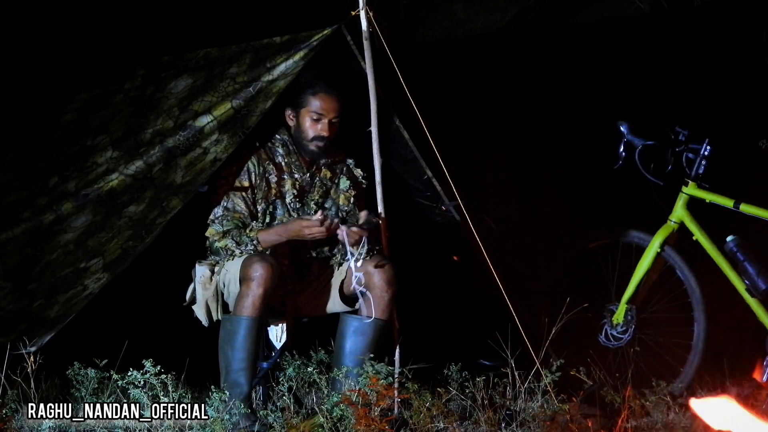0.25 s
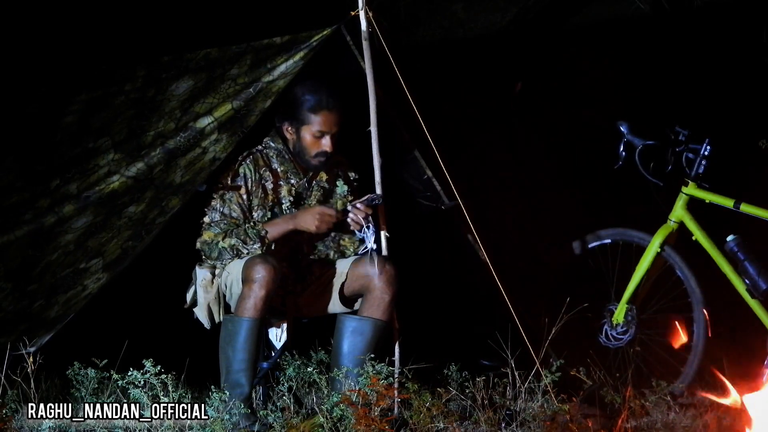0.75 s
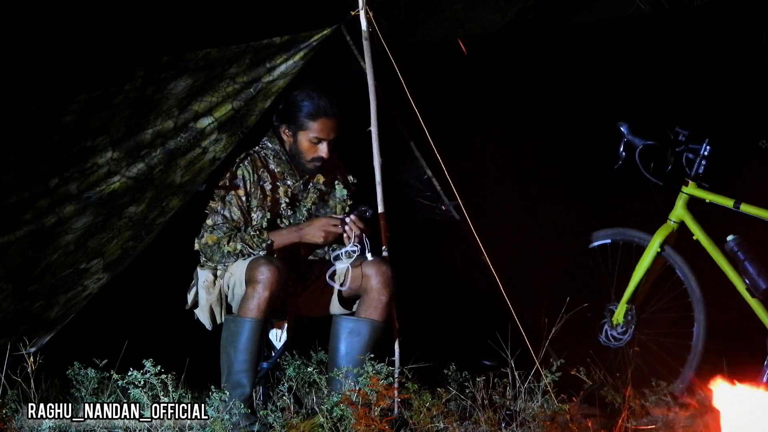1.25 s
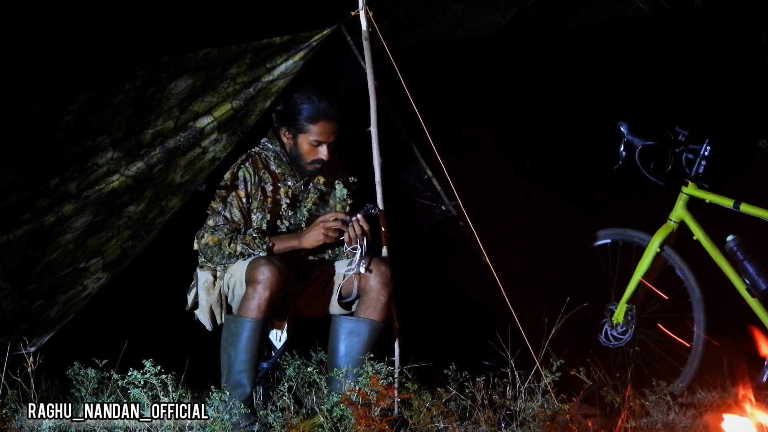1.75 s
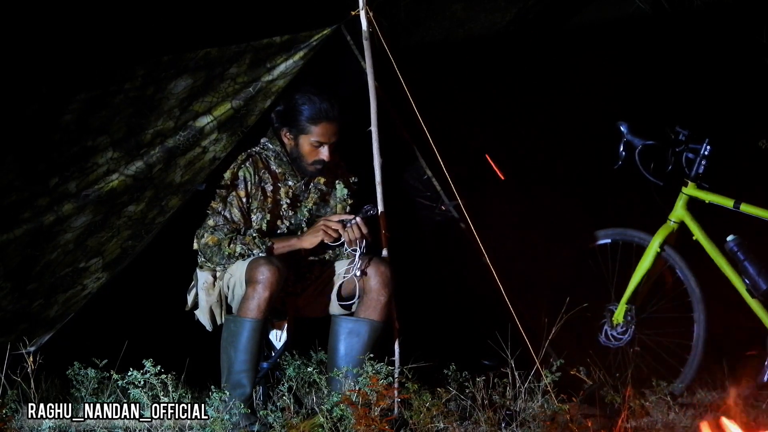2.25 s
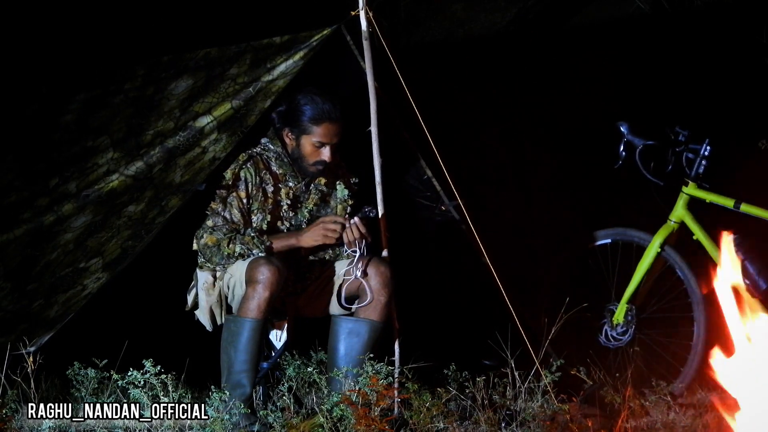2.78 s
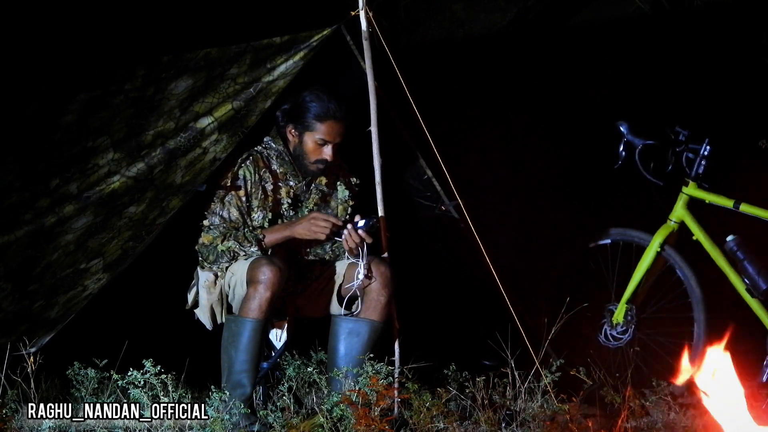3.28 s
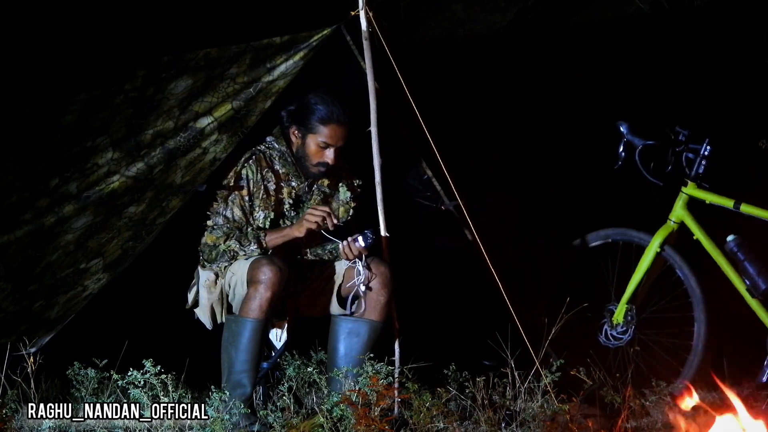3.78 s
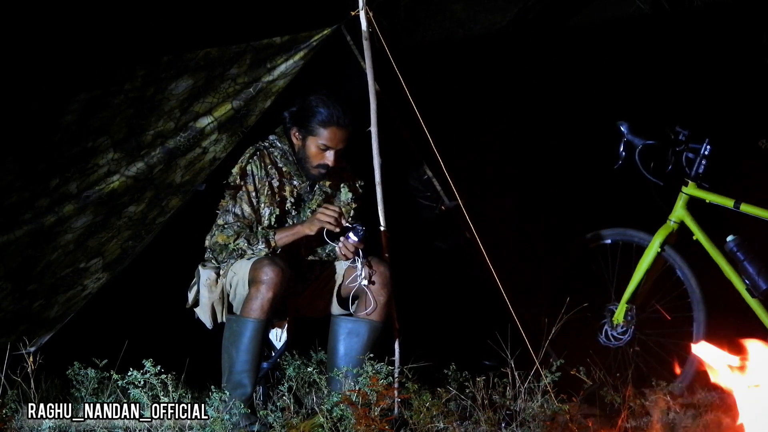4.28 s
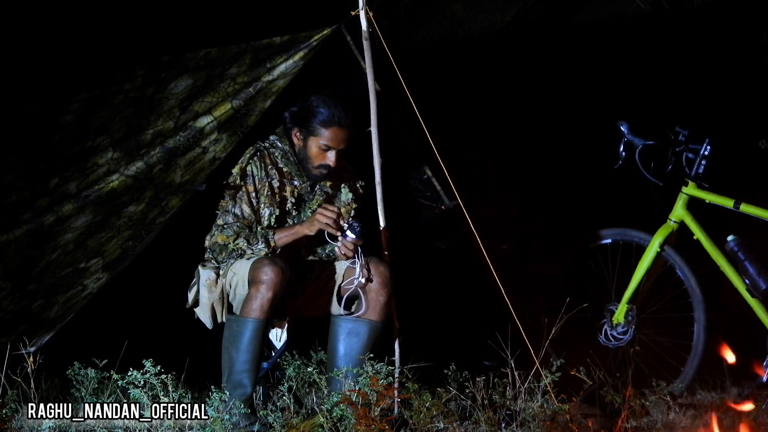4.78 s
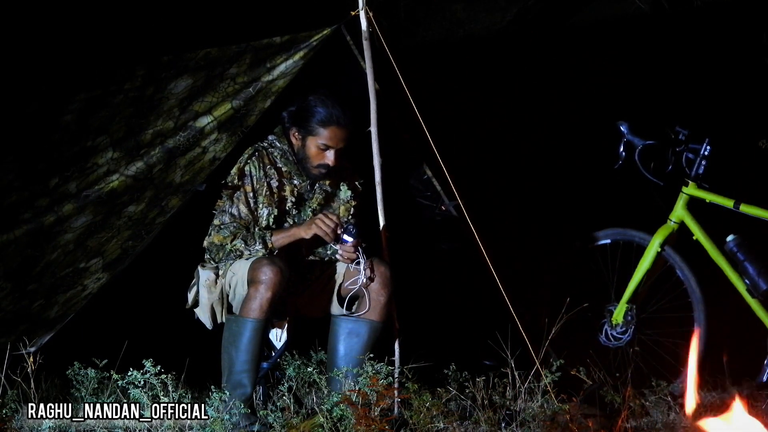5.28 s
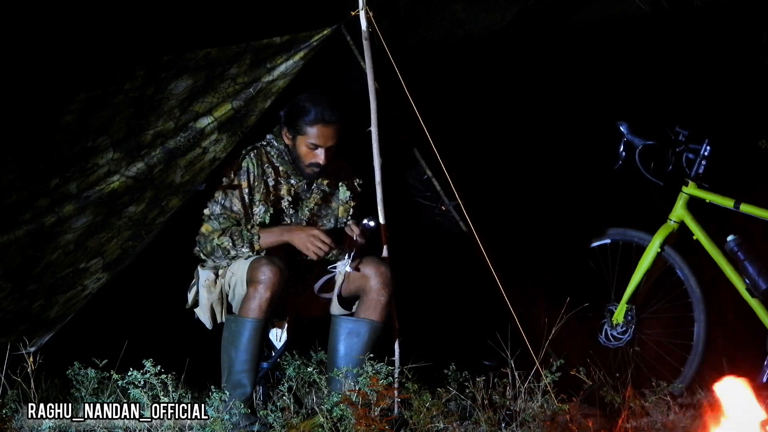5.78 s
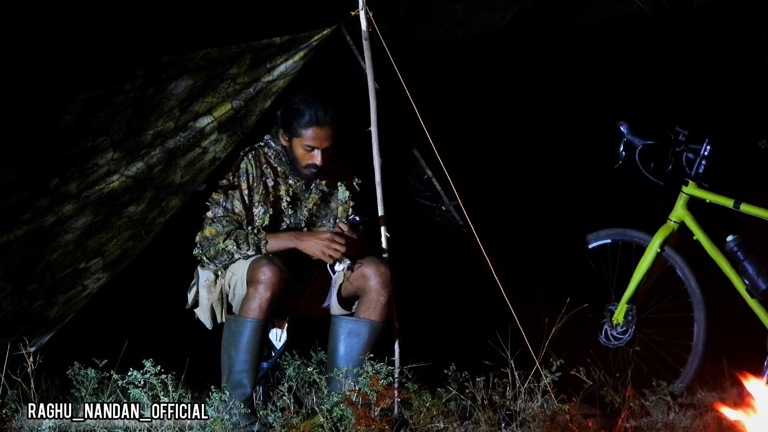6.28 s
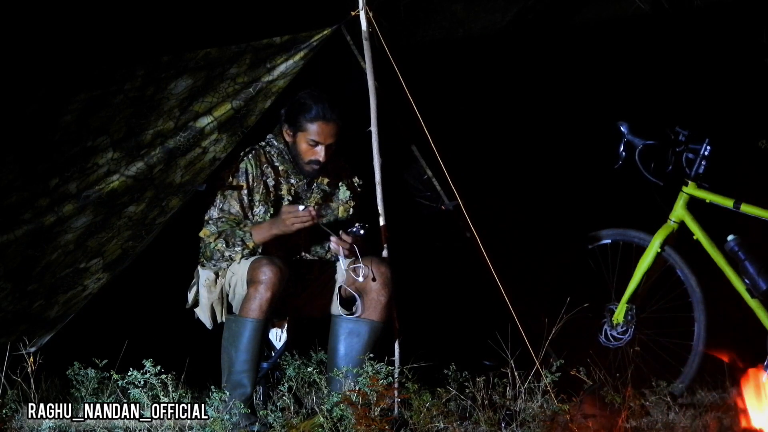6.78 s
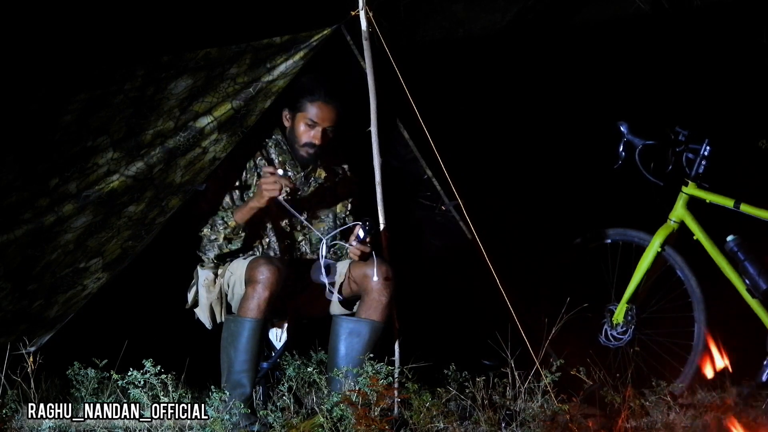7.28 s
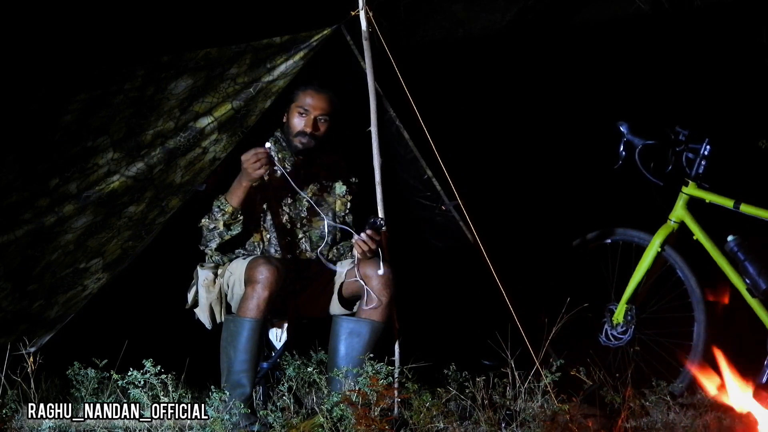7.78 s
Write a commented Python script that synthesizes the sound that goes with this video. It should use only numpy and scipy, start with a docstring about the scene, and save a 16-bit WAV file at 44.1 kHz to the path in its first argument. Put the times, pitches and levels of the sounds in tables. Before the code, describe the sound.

A shimmering wall of insects at night, one near cricket pulsing in phrases, while a little fire softly flutters, ticks and cracks.

```python
"""Outdoors at night by a small campfire. A near cricket sings pairs of falling strokes over crowds of crickets
trilling in three bands; two others chirp in fours and a katydid buzzes on the right, all as pulsed tones.
The fire is filtered noise that rumbles, flaps and fizzes, with pops, ticks and soft puffs.
Faint falling chirps, two hoots and a bed of coloured noise for the far insects lie behind."""
import sys
import numpy as np
from scipy import signal
from scipy.fft import rfft, irfft
from scipy.io import wavfile
from scipy.ndimage import uniform_filter1d

SR = 44100
rng = np.random.default_rng(int(sys.argv[2]) if len(sys.argv) > 2 else 0)


def wav_record(signal):
    """Record a signal, one row per channel, as 16-bit PCM in the file named by sys.argv[1]."""
    frames = np.transpose(np.atleast_2d(signal))
    bounded = np.clip(frames, -1, 1)
    # unit amplitude maps onto the largest positive 16-bit level
    quanta = np.round(bounded * 32767).astype(np.int16)
    wavfile.write(sys.argv[1], SR, quanta)


def volts(x):
    """Linear amplitude factor 10**(x/20) for a level x in dB, scalar or array-like."""
    e = np.asarray(x, float) / 20
    return 10 ** e


N = 354769


def evened(x):
    """Scales to unit power."""
    return x / np.sqrt(np.mean(x ** 2) + 1e-20)


def curve(rows, order=1):
    """One column of a table over time."""
    rows = np.transpose(rows)
    return np.interp(np.arange(N) / SR, rows[0], rows[order])


def read(points, hz):
    """A table over frequency, read at hz on a log axis."""
    f, value = np.transpose(points)
    return np.interp(np.log(hz + 1), np.log(f + 1), value)


def placed(x, pan_db):
    """Two channels, left minus right = pan_db."""
    return x * volts([[pan_db / 2], [-pan_db / 2]])


def add(mix, s, sound):
    """Mixes a two-channel sound in at s seconds."""
    part = mix[:, round(s * SR):][:, :sound.shape[1]]
    part += sound[:, :part.shape[1]]


def slow(hz):
    """Slow random curve, hz new values per second, unit power."""
    return evened(np.interp(np.arange(N) * hz / SR, np.arange(2100), rng.standard_normal(2100)))


def scattered(x, t60_s):
    """Leaves and trunks return sparse decaying echoes, different ones to each ear."""
    t = np.arange(round(.4 * SR)) / SR
    sparse = rng.random((2, len(t))) < .05
    taps = rng.standard_normal((2, len(t))) * sparse * volts(-60 * t / t60_s) * (t > .002)
    taps = taps / np.linalg.norm(taps, axis=1)[:, None]
    return signal.fftconvolve(x, taps, axes=1)[:, :N]


def noise(colour, same, side_db):
    """Two channels of coloured noise; same = left-right likeness, side_db = left minus right."""
    hz = np.fft.rfftfreq(N, 1 / SR)
    a, b = rfft(rng.standard_normal((2, N)))
    left = a * volts(side_db / 2)
    right = (same * a + np.sqrt(1 - same ** 2) * b) / volts(side_db / 2)
    return evened(irfft(np.array([left, right]) * volts(read(colour, hz)), N))


def stroke(length_s, from_hz, to_hz, early=1):
    """One closing of the wings: a swelling tone that glides in pitch; early < 1 moves the swell forward."""
    count = round(length_s * SR)
    swell = np.sin(np.pi * np.linspace(0, 1, count) ** early) ** 2
    return swell * np.sin(2 * np.pi * np.cumsum(np.linspace(from_hz, to_hz, count)) / SR)


def near_cricket():
    """Pairs of falling strokes in phrases that slow as the singer tires; an echo from the ground."""
    # (start [s], pairs [count], first gap [ms], slowing [ms per pair])
    phrases = [(.043, 24, 60.05, .1), (1.565, 20, 57.9, .134), (2.798, 18, 57.65, .344),
               (3.943, 18, 57.8, .182), (5.034, 3, 58.5, 4), (5.27, 12, 56.2, .8), (6.042, 15, 57.9, .448),
               (7.007, 17, 59.4, .054)]
    # (time [s], gain [dB])
    pair_gain = [(0, -40), (2.5, -38), (4, -39.5), (5, -41.5), (6, -39.5), (7.3, -39), (8.04, -36)]
    out = np.zeros((2, N))
    for start, pairs, gap_ms, slowing_ms in phrases:
        n = np.arange(pairs)
        times = start + (gap_ms * n + slowing_ms * n * (n - 1) / 2) / 1000
        for s, (a, b, c, d) in zip(times, rng.standard_normal((pairs, 4))):
            s = s + .001 * (1 + d)
            pan_db = -7.5 + 0.21 * s  # bearing drifts toward the middle
            for after_s, db in ((0, a - 1), (.0195 + .0003 * c, b)):
                sound = stroke(0.0195, 8050 + 40 * c, 6150 + 40 * c, early=0.65)
                add(out, s + after_s, placed(volts(db) * sound, pan_db))
    out[:, 125:] += 0.52 * out[:, :-125]  # ground echo, 2.8 ms
    echoes = volts(-12) * scattered(out, .12)
    return volts(curve(pair_gain)) * (out + echoes)


def crowd(low_hz, high_hz, fall_hz, rate, share, pan_db, wet_db, count=14, spread=.1):
    """Each singer trills at its own drifting pitch and pace, swelling and fading."""
    t, out = np.arange(N) / SR, np.zeros((2, N))
    for hz in np.linspace(low_hz, high_hz, count):
        pace = rate * (1 + spread * rng.uniform(-1, 1))
        turns = t * pace + rng.random() + 5 * spread * slow(5)
        within = np.minimum(turns % 1 / share, 1)  # 0..1 through a stroke, then silence
        pitch_hz = hz * (1 + .008 * slow(25)) + fall_hz * (.5 - within)
        tone = np.sin(2 * np.pi * np.cumsum(pitch_hz) / SR)
        trill = np.sin(np.pi * within) ** 2 * volts(1.8 * slow(9)) * tone
        out += placed(trill, pan_db + rng.normal(0, 3))
    dry_crowd = evened(out)
    return evened(dry_crowd + volts(wet_db) * scattered(dry_crowd, 0.58))


def crowds():
    """Three kinds of cricket trill by fast strokes; the low ones are fewer and keep a firmer pace."""
    # (lowest [Hz], highest [Hz], fall in a stroke [Hz], mean rate [strokes/s], share of time sounding [0..1],
    #  mean left-right [dB], scattered against dry [dB]); rows low, middle, high
    kinds = [(2783, 3040, 260, 54, 0.73, -10, -8), (4593, 4830, 300, 41, .7, -2, -8.5),
             (7030, 9300, 1100, 47, .6, 3, 4)]
    # (time [s], low level [dB], middle level [dB])
    swell = [(0.0, -44.5, -54), (1.72, -45, -52), (7.08, -43, -52), (8.04, -45, -52)]
    low = crowd(*kinds[0], count=12, spread=.05)
    middle, high = (crowd(*row) for row in kinds[1:])
    return low * volts(curve(swell)) + middle * volts(curve(swell, order=2)) + high * volts(-49.5)


def chirper(pace, pan_db):
    """A cricket chirps four falling strokes at a nearly even pace."""
    # (time against the last stroke [s], mean level [dB])
    fours = [(-.12, -3), (-.089, 1), (-.045, 3), (0, 2)]
    out, (number, last_s) = np.zeros((2, N)), np.transpose(pace)
    for s in np.interp(np.arange(number[-1] + 1), number, last_s):
        for offset_s, db in fours:
            sound = stroke(.017, 5780, 5150, early=.7)
            add(out, s + offset_s, placed(volts(db + rng.normal(0, 1.6)) * sound, pan_db))
    return out + volts(-9) * scattered(out, 0.05)


def chirpers():
    """Two crickets chirp in fours, one right and one left, each at its own pace."""
    # (chirp number, time of its last stroke [s])
    right_pace = [(0, .235), (1, .474), (2, .683), (3, .912), (4, 1.175), (9, 2.41), (16, 4.1), (32, 8.0)]
    left_pace = [(0, .13), (9, 2.077), (14, 3.195), (19, 4.283), (20, 4.578), (31, 7.281), (33, 7.819)]
    # (time [s], gain [dB])
    right_gain = [(0, -55), (3.5, -56.5), (5, -57), (8.04, -58.5)]
    return volts(curve(right_gain)) * chirper(right_pace, -17.0) + volts(-60) * chirper(left_pace, 7)


def katydid():
    """A fast scrape on every wing beat and a weaker one on the way back; no two catch the file alike."""
    # (time [s], rate [wing beats/s])
    beat_rate = [(0, 189.7), (1.8, 189.65), (2.3, 190.2), (3.2, 190.35), (8.05, 190.37)]
    # (time [s], level [dB])
    buzz_level = [(0.0, -48.5), (0.31, -46.5), (1.14, -50), (3.71, -46.5), (4.75, -47.5), (6.02, -48),
                  (6.56, -44), (7.19, -44.5), (8.04, -45)]
    # wing resonance: (frequency [Hz], gain [dB])
    wing = [(9800, -32), (10500, -17), (11100, -7), (11600, -5), (12100, 0), (12650, -7), (13400, -9),
            (16000, -19)]
    # narrow bands that come and go: (centre [Hz], width [Hz])
    bands = [(11240, 110), (12700, 250)]
    # (time [s], first band against the buzz [dB], second band against the buzz [dB])
    band_levels = [(0, -5, -8), (1.3, -21.5, -17), (3.6, -15.5, -20), (4.6, -9, -21), (8.04, -12, -21)]
    turns, scrapes = np.cumsum(curve(beat_rate)) / SR, 0
    for late_turns, db in ((0, 5), (.55, -8)):
        beat = turns - late_turns + 1
        size, slip, pitch = rng.standard_normal((2000, 3)).T
        n, t = beat.astype(int), (beat % 1 - .5) / 190  # beat number; seconds from its middle
        glide = (11800 + 120 * pitch[n]) * t - 1.3e6 * t ** 2  # falling pitch, in cycles
        phase = 2 * np.pi * glide + 1.45 * np.cumsum(slip)[n]
        scrapes = scrapes + volts(db + size[n]) * np.exp(-(t / 0.0043) ** 2) * np.sin(phase)
    hz, z = np.fft.rfftfreq(N, 1 / SR), rfft(scrapes)
    rung = evened(irfft(z * volts(read(wing, hz)), N))
    for k, (f, width) in enumerate(bands, 1):
        band = evened(irfft(z * np.exp(-((hz - f) / width) ** 2), N))
        rung = rung + volts(curve(band_levels, order=k)) * band
    near = placed(rung, -15) * volts(0.9 * slow(8))
    echoes = scattered(placed(rung, -14.0), 0.07)
    return volts(curve(buzz_level)) * evened(near + echoes)


def pop(db, length_ms, thump_db, crack_db, pan_db=-3.0):
    """A pocket of gas bursts: one pressure swing, a sharp edge, a dull thump just after, then splinters."""
    t = np.arange(900) / SR
    turns = t * 1000 / length_ms
    swing = -np.sin(2 * np.pi * turns) * (turns / 0.36) * np.exp(1 - turns / 0.27)
    edge = -np.exp(-((t - .00015) / .00004) ** 2)
    highpass = signal.butter(1, 450, "high", fs=SR, output="sos")
    snap = signal.sosfilt(highpass, swing + volts(crack_db) * edge)
    late = np.maximum(t - .0024, 0)
    thump = np.sin(2 * np.pi * 240 * late) * np.exp(-late / 0.003)
    dull_noise = evened(uniform_filter1d(uniform_filter1d(rng.standard_normal(900), 30), 22))
    splinters = dull_noise * np.sqrt(t / 0.0013) * np.exp(-t / 0.0042)
    after = volts(thump_db) * (thump + 0.26 * splinters)
    return placed(volts(db) * (1.26 * snap + after), pan_db)


def tick(db, top_db, pan_db=3):
    """A spark: a snap and a millisecond of bright noise, in a lower and an upper band."""
    t = np.arange(300) / SR
    burst = 4.0 * (t == 0) + rng.standard_normal(300) * np.exp(-t / 0.0007)
    low = signal.sosfilt(signal.butter(2, [8800, 12000], "band", fs=SR, output="sos"), burst)
    top = signal.sosfilt(signal.butter(2, [12000, 15800], "band", fs=SR, output="sos"), burst)
    return placed(volts(db) * (low / abs(low).max() - volts(top_db) * top / abs(top).max()), pan_db)


def thud(db, hz):
    """A tongue of flame catches: two soft low swings, rising in pitch."""
    return placed(volts(db) * stroke(1.9 / hz, 0.67 * hz, 1.16 * hz), -4)


def crackle():
    """Bursting wood, sparks and puffs at set times, and many small pops, dull puffs and ticks by chance."""
    # (time [s], swing gain [dB], swing length [ms], thump against swing [dB], crack against swing [dB])
    pops = [(0.5298, -17, 0.89, -26, -40), (0.824, -32.5, 0.84, -35, 4), (1.593, -48, 0.49, 11, -11.5),
            (1.943, -27.5, 0.87, -16.5, -22.5), (2.1607, -26, 0.65, -26, 0),
            (2.3563, -10.5, 0.85, -8.5, -40), (2.475, -37, 2, -5, -25), (2.5073, -35, 0.72, -19, -15.5),
            (2.6136, -32, 0.91, -13, -21.5), (2.7999, -40, 1.4, -9, -35), (3.0258, -39.5, 0.86, -4, -12.5),
            (3.113, -37.5, 0.54, -18, -15.5), (3.709, -36.5, 0.48, -15, -18.5), (4.036, -40, 1.1, 2, 10),
            (4.339, -37, 1.4, -2, -25), (4.449, -45, 0.63, -12, -20), (4.6209, -36.5, 0.6, -21, 9),
            (4.752, -36, 0.64, -5, -27.5), (4.8518, -39, 0.92, -18, -18.5), (5.423, -32, 0.96, -19, -27.5),
            (5.493, -40, 1.4, -11, -25), (5.957, -37, 1.1, -12, -25), (6.0664, -18.5, 0.63, -26, 5),
            (6.0959, -19, 0.93, -16, 2.5), (6.3513, -35.5, 0.55, -5.5, -15.5),
            (6.6879, -29, 0.67, -16, -20.5), (7.069, -32.5, 1.23, -12, -35), (7.196, -33, 1.2, -26, -21),
            (7.4068, -33, 0.99, -16, -19.5), (7.49, -37.5, 1.4, -25, -23.5), (7.592, -34, 0.56, -23, -17.5)]
    # sparks: (time [s], lower band gain [dB], upper band against lower [dB])
    ticks = [(0.615, -26, -8), (0.824, -24.5, 0), (1.1725, -33, -6), (1.248, -23.5, -3), (1.4022, -27, -4),
             (1.838, -25, -11), (2.161, -20, -19), (3.4221, -32, 0), (3.9547, -31, -7), (3.9912, -35, -8),
             (4.0572, -28, -12), (4.118, -27, -9.5), (4.191, -22, -12), (4.542, -29, -6),
             (4.7137, -28.5, -1.5), (4.8513, -31, -3), (5.0394, -31, -2.5), (5.8525, -31, -9),
             (6.0646, -35, -5), (6.0661, -16.5, -15), (7.9143, -27, -4), (7.93, -27, -8)]
    # dull puffs of flame: (time [s], gain [dB], nominal pitch [Hz])
    thuds = [(3.058, -40.5, 267), (4.208, -41, 275), (5.316, -37, 276), (5.636, -37.5, 330),
             (6.1, -29.5, 500), (6.826, -36, 162)]
    base_pop_db, base_puff_db, base_tick_db, spread_db = -54.5, -64.5, -50, 4.5
    out = np.zeros((2, N))
    for sound, rows in ((pop, pops), (tick, ticks), (thud, thuds)):
        for s, *row in rows:
            add(out, s, sound(*row))
    for when, size, sharp, bright, dull in rng.random((320, 5)):
        extra_db = -spread_db * np.log(1.03 - size)  # many faint, few loud
        small_pop = pop(base_pop_db + extra_db, 0.48 + 0.64 * sharp, -3.5, -27, 16 * dull - 10)
        add(out, N / SR * when, small_pop)
        add(out, N / SR * dull, pop(base_puff_db + extra_db, 0.84, 1.6, -25))
        add(out, N / SR * bright, tick(base_tick_db + extra_db, -6))
    return out + volts(-30) * scattered(out, .04)


def flames():
    """Noise in bands: a fluttering rumble, lumpy flapping of the flames above it, and a steadier fizz."""
    # (frequency [Hz], level [dB])
    colour = [(12, -11), (20, 5.5), (91, -2), (267, -5.5), (605, -12), (1460, -21.5), (2170, -19.5),
              (2350, -22.5), (3060, -44), (5170, -120)]
    # (frequency [Hz], left-right likeness [0..1])
    likeness = [(60, 0.26), (180, 0.63), (550, 0.63), (1650, 0.51)]
    # (frequency [Hz], left-right [dB])
    side = [(30, 3.5), (90, -3), (350, -2), (1800, 0.5)]
    # (time [s], mean rumble level [dB])
    flutter = [(0.0, -42.5), (1.21, -52.5), (1.48, -42.5), (1.59, -51.5), (2.75, -56.5), (3.4, -57),
               (3.49, -46), (6.54, -53.5), (6.87, -48), (8.04, -48.5)]
    # flapping and fizz: (time [s], level [dB])
    roar_level = [(0.0, -56.5), (2.13, -57), (3.67, -54.5), (4.59, -56.5), (5.73, -55.5), (6.6, -56),
                  (6.84, -52.5), (7.02, -54.5), (7.72, -56.5), (8.04, -55.5)]
    hz = np.fft.rfftfreq(N, 1 / SR)
    both = noise(colour, read(likeness, hz), read(side, hz))
    rumble, below = (signal.sosfiltfilt(signal.butter(2, f, fs=SR, output="sos"), both) for f in (100, 550))
    flapping = (below - rumble) * volts(2.0 * slow(18) + 0.87 * slow(3.72))
    fizz = both - below
    roar = evened(flapping + fizz) * volts(curve(roar_level))
    return evened(rumble) * volts(curve(flutter) + 1.35 * slow(7.4)) + roar


def hoot(length_s, start_hz, middle_hz, end_hz, db, second_db, late):
    """A short hoarse call that bends in pitch; late > 1 moves its swell toward the end."""
    u = np.linspace(0, 1, round(length_s * SR))
    waver, hoarse = slow(90)[:len(u)], slow(160)[:len(u)]
    bend = np.polyfit([0, .5, 1], [start_hz, middle_hz, end_hz], deg=2)
    hz = np.polyval(bend, u) * (1 + .02 * waver)
    phase = 2 * np.pi * np.cumsum(hz) / SR
    levels_db = (0, second_db, second_db - 13, second_db - 13)
    partials = sum(volts(d) * np.sin(k * phase) for k, d in enumerate(levels_db, 1))
    return placed(volts(db + 3 * hoarse) * np.sin(np.pi * u ** late) * partials, -8)


def small_voices():
    """Faint falling chirps, roughened by fast level changes, and two hoots, far off among the trees."""
    # runs: (start [s], chirps [count], mean gap [s], mean gain [dB], nominal pitch [Hz])
    chirp_runs = [(.004, 4, .0515, -57, 1450), (.012, 4, .047, -60, 2050), (.203, 5, .011, -57, 1750),
                  (.29, 4, .02, -58, 1700), (1.42, 1, 0, -58, 2100), (2.643, 1, 0, -55, 2150),
                  (3.776, 4, .05, -60, 2000), (5.082, 2, .012, -59, 1600), (6.164, 3, .049, -59, 2050),
                  (6.304, 4, .02, -59, 1850)]
    # (time [s], length [s], start pitch [Hz], middle pitch [Hz], end pitch [Hz], mean gain [dB],
    #  second partial against first [dB], lateness of swell [exponent])
    hoots = [(.875, .1, 470, 450, 490, -52, -3, 2.8), (1.43, .075, 450, 520, 485, -53, -7, 1)]
    out = np.zeros((2, N))
    for start, chirps, gap_s, db, hz in chirp_runs:
        for k, (a, b, c) in enumerate(rng.standard_normal((chirps, 3))):
            pitch_hz = hz * (1 + 0.025 * a)
            sound = volts(db + b) * stroke(0.022, 1.36 * pitch_hz, 0.7 * pitch_hz)
            add(out, start + k * gap_s * (1 + .04 * c), placed(sound, 14))
    out = out * (1 + .45 * slow(260))  # hoarse
    out = out + volts(-4) * scattered(out, .09)
    for s, *row in hoots:
        add(out, s, hoot(*row))
    return out


def far_insects():
    """Far insects merge into a steady coloured noise."""
    # (frequency [Hz], relative level [dB])
    colour = [(2500, -32), (3780, -33), (3900, -11), (4100, -2), (5300, -1.5), (6000, -11.5), (6400, -2),
              (7800, 2), (9000, -7), (10100, -8.5), (11200, -7.5), (16000, -14.5)]
    return volts(-45.5) * noise(colour, same=0.3, side_db=0.22)


def scene():
    """Insects all round, the fire in front."""
    insects = near_cricket() + crowds() + chirpers() + katydid() + far_insects()
    return insects + crackle() + flames() + small_voices()


def roll_off(x):
    """The treble ends steeply here."""
    return signal.sosfilt(signal.butter(12, 16500, fs=SR, output="sos"), x)


def record(dry):
    """Limits the band with a steep linear-phase low-pass at 15870 Hz."""
    lowpass = signal.firwin(511, 15870, window=("kaiser", 9), fs=SR)
    limited = signal.oaconvolve(dry, lowpass[None], "same")
    return roll_off(limited)


dry = scene()
out = record(dry)
wav_record(out)
```